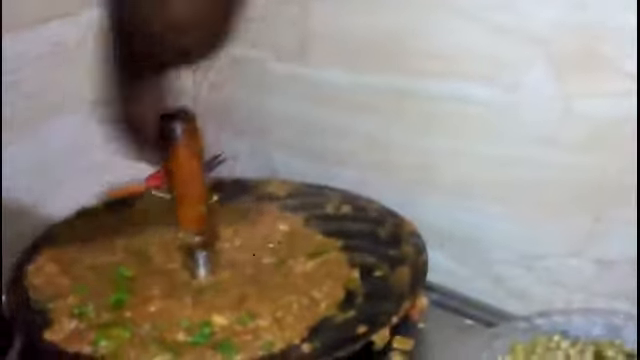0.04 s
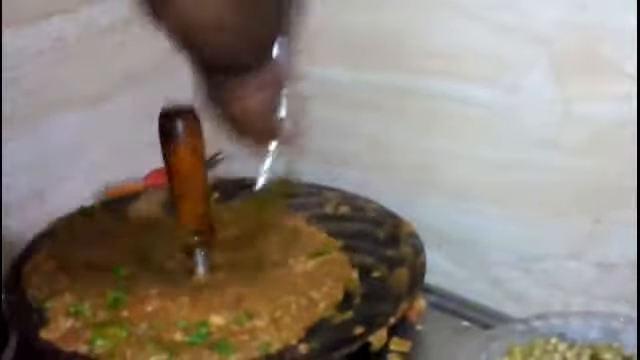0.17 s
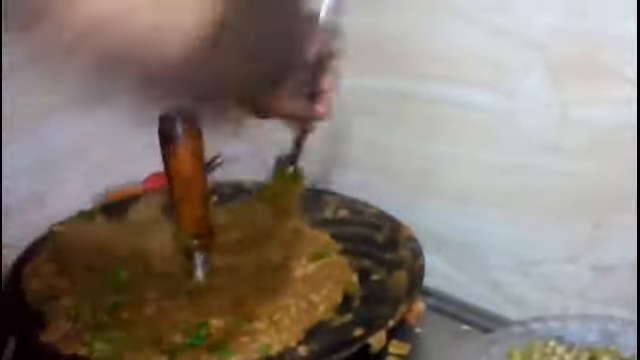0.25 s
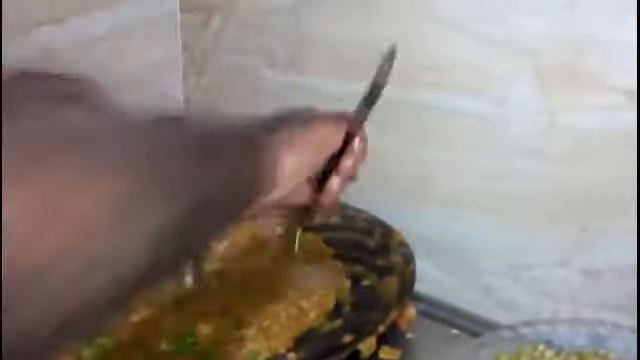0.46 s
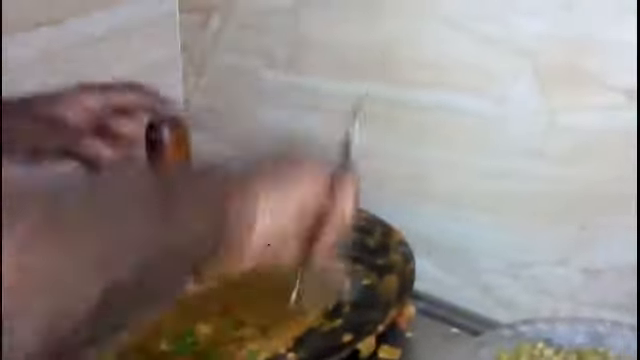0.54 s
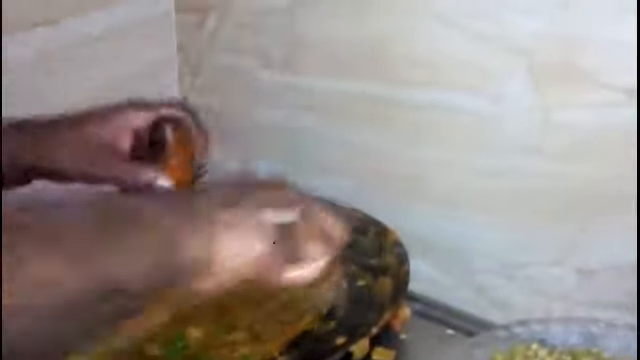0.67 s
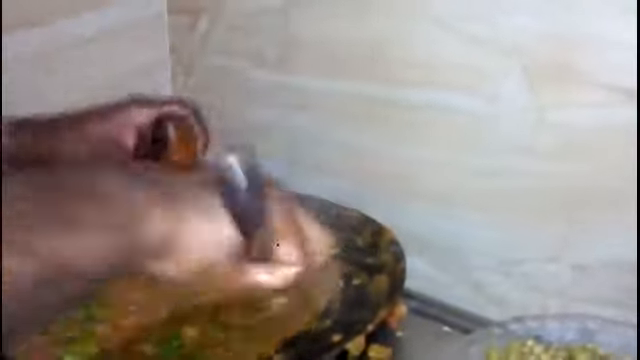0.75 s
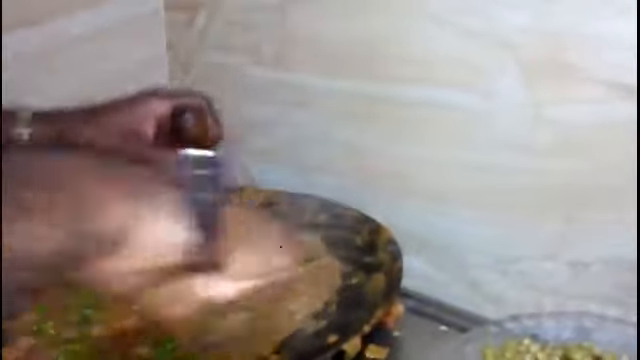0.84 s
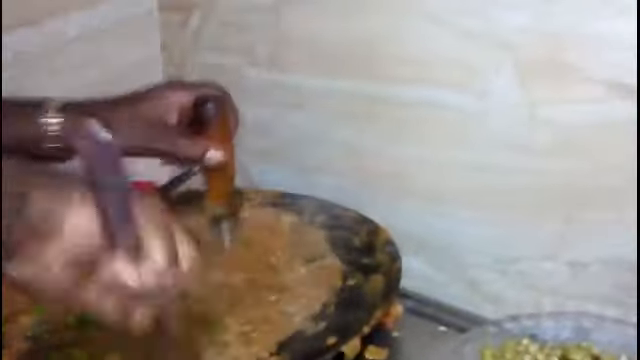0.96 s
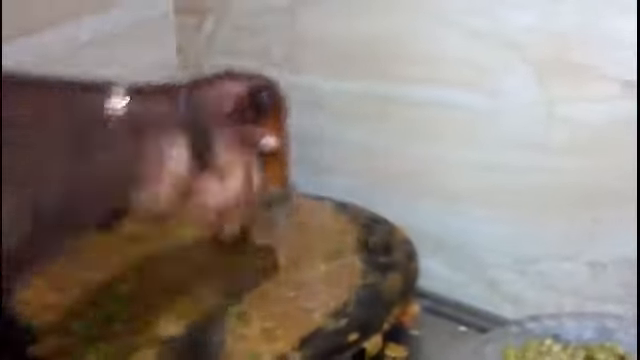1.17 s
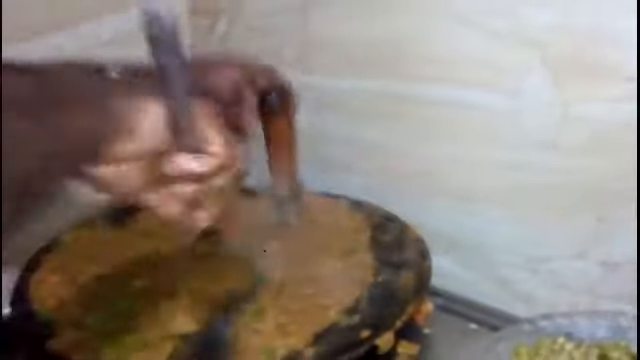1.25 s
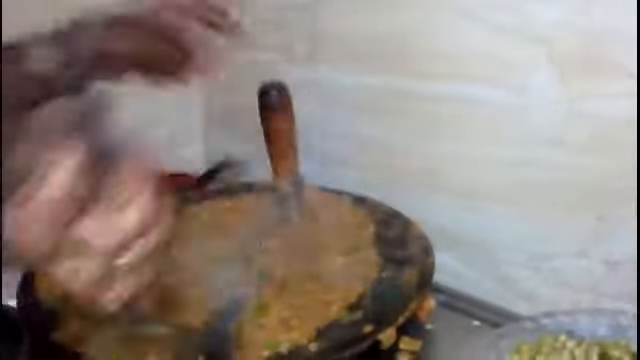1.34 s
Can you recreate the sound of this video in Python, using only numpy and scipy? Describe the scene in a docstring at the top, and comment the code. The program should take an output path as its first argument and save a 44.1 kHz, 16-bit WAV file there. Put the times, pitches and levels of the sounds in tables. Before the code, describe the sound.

Metal spatula scrapes and clanks on an iron griddle, two loud hits amid short scrapes

```python
"""A steel spatula works thick food on a flat iron griddle in a small tiled kitchen, over a faint steady sizzle.
First the blade scrapes: dense random slips, coloured, with noisy resonances that swell as the edge catches.
Then it comes down four times: noise bursts for the clatter, decaying sines for the brief ring of both metals.
Soft arches of narrow noise squelch from the opening scrape until after the last blow, as food is pushed.
From the last blow the blade slides on in a second scrape; a light touch of the edge follows."""
import sys
import numpy as np
from scipy import signal
from scipy.fft import rfft, irfft, next_fast_len
from scipy.io import wavfile

SR = 44100
rng = np.random.default_rng(int(sys.argv[2]) if len(sys.argv) > 2 else 0)


def digitize_waveform(pressure):
    """Quantize a signal to 16-bit integers and store it at the path in sys.argv[1].

    Rows of a 2-D input are taken as channels; values are limited to [-1, 1].
    """
    field = np.atleast_2d(pressure).T
    bounded = np.clip(field, -1, 1)
    quanta = np.round(bounded * 32767).astype(np.int16)
    wavfile.write(sys.argv[1], SR, quanta)


N = 61739
TIME = np.arange(N) / SR  # s

# blows of the spatula: t/s, crack level/dB, clatter level/dB, clatter t60/s, swell/s, griddle level/dB,
# strike place (0 inner - 1 outer), blade level/dB, blade tilt (0 flat - 1 edge on)
SPATULA_BLOWS = [(0.2408, -28.5, -20.5, .13, 0.00053, -47, .8, -51.5, .1),
                 (0.4823, -9.5, -13, .13, 0.0013, -19.5, 0.017, -27.5, .15),
                 (0.6822, -7, -13.5, .13, 0.0019, -26.5, 0.68, -26, .05),
                 (1.0126, -16, -30.5, 0.044, 0.00073, -41.5, 0.86, -28.5, .97)]
# griddle modes: f/Hz, t60/s when struck, level/dB at the inner place, level/dB at the outer place
GRIDDLE_MODES = [(655.4, 0.15, 2.5, -17.5), (716.3, .2, 0, -9.5), (844, 0.19, 0, -4),
                 (892, 0.18, 2.5, -24.5), (956, 0.14, -4.5, -18), (1099, 0.15, -8, -4.5),
                 (1111, .17, -11.5, 0.5), (1213, 0.33, -5.5, 0.5), (1215, .16, -2, -2.5),
                 (1313, .18, -0.5, -9), (1386, 0.45, -8.5, -6), (1514, 0.31, -21.5, -7.5),
                 (1689, 0.16, -6.5, -4), (1776, 0.19, -5.5, -8)]
# blade modes: f/Hz, t60/s when struck, level/dB landing flat, level/dB landing on the edge
BLADE_MODES = [(2330, 0.35, -7, -25), (2640, 0.03, -8.5, 0.5), (2740, .12, -8.5, -9.5),
               (3010, 0.064, -8, -22.5), (3240, .17, 0, -23.5), (3210, 0.26, -8.5, -21.5),
               (3280, 0.044, -7, -2), (3410, 0.23, -8, -19.5), (3640, 0.11, -4, -9), (3910, .2, -5, -19),
               (3860, 0.15, -4, -2.5), (4065, 0.017, -5.5, 4.5), (4600, 0.15, -10, -22.5),
               (4670, 0.23, 1, -8.5), (4820, .06, -12.5, -8), (5550, .07, -10.5, -4.5),
               (6780, .14, -13.5, -19.5), (6680, .06, -13, -2.5), (8100, 0.023, -22.5, -4),
               (7820, 0.046, -21.5, -6.5)]


def from_db(db):
    """Decibels to gain."""
    return 10 ** (np.asarray(db) / 20)


def rms_one(x):
    """Scale to unit rms."""
    return x / np.sqrt(np.mean(x ** 2) + 1e-20)


def at_hz(points, hz):
    """Read a table on a log-frequency axis."""
    f, value = np.transpose(points)
    return np.interp(np.log(np.maximum(hz, 1)), np.log(f), value)


def low_cut(x, hz):
    """Third-order high-pass."""
    return signal.sosfilt(signal.butter(3, hz, "high", fs=SR, output="sos"), x + 1e-18)


def coloured(x, spectrum):
    """Give x a smooth spectrum; rms 1."""
    size = next_fast_len(N)
    gain = from_db(at_hz(spectrum, np.fft.rfftfreq(size, 1 / SR)))
    return rms_one(irfft(rfft(x, size) * gain, size)[:N])


def resonant_noise(hz, width_hz):
    """Noise through a two-stage resonance; rms 1."""
    ratio = np.exp(np.arcsinh(width_hz / hz / 2))
    edges = [hz / ratio, min(hz * ratio, SR / 2 - 1)]
    band = signal.butter(2, edges, "band", fs=SR, output="sos")
    return rms_one(signal.sosfilt(band, rng.standard_normal(2 * N))[N:])  # drop the filter's build-up


def struck(start, swell, t60):
    """Envelope that swells quickly and dies away."""
    age = np.maximum(TIME - start, 0)
    return (1 - np.exp(-age / swell)) * np.exp(-np.log(1000) * age / t60)


def mode(start, hz, swell, t60):
    """One decaying sine."""
    return struck(start, swell, t60) * np.sin(2 * np.pi * hz * (TIME - start))


def pressed_mode(start, hz, swell, t60):
    """A decaying sine that builds up more gradually, under a soft, long contact."""
    return (1 - np.exp(-np.maximum(TIME - start, 0) / swell)) * mode(start, hz, swell, t60)


def swelling(middle, length, hz, width_hz, glide=0):
    """A noisy resonance that rises and falls in one arch while its centre glides (Hz per s); rms 1 at the top."""
    from_middle = TIME - middle
    arch = np.cos(np.pi * np.clip(from_middle / length, -.5, .5))
    narrow = signal.butter(2, width_hz / 2, fs=SR, output="sos")
    a, b = signal.sosfilt(narrow, rng.standard_normal((2, N + SR // 10)))[:, -N:]
    phase = 2 * np.pi * (hz + glide * from_middle / 2) * from_middle
    noise = a * np.cos(phase) + b * np.sin(phase)  # slow noise shifted up to the centre
    return rms_one(arch * noise) * np.sqrt(np.mean(arch ** 2))


def through_modes(x, modes):
    """Drive a bank of two-pole resonators, one per mode, all with one ring time; rms 1."""
    ring_t60_s = 0.15
    r = from_db(-60 / (ring_t60_s * SR))  # decay per sample
    out = 0
    for hz, _, first_db, second_db in modes:
        poles = [1, -2 * r * np.cos(2 * np.pi * hz / SR), r * r]
        ring = signal.lfilter([1, 0, -1], poles, x + 1e-18)
        out = out + from_db((first_db + second_db) / 2) * ring
    return rms_one(out)


def sizzle_and_air():
    """Faint sizzle and still kitchen air: steady coloured noise."""
    # spectrum: f/Hz, relative level/dB per Hz
    air_colour = [(25, -15), (60, -4.5), (90, -1), (130, -1), (300, -5.5), (900, 3.5), (2500, -13),
                  (6000, -11), (10000, -15.5), (15000, -20.5)]
    level_db = -63.5
    return from_db(level_db) * coloured(rng.standard_normal(N), air_colour)


def kitchen(x):
    """Diffuse echo of tiled walls: noise bands that die away, the low ones slowest."""
    # reverberation: f/Hz, t60/s
    room_t60 = [(150, 0.55), (700, 0.4), (2000, 0.31), (4000, 0.27), (8000, 0.25), (14000, 0.28)]
    delay_s, swell_s = 0.004, 0.004
    edges = np.geomspace(60, 16000, 9)  # Hz
    tail = 0
    for low, high in zip(edges, edges[1:]):
        band_filter = signal.butter(3, [low, high], "band", fs=SR, output="sos")
        band = signal.sosfilt(band_filter, rng.standard_normal(N))
        tail = tail + band * struck(delay_s, swell_s, at_hz(room_t60, np.sqrt(low * high)))
    return signal.fftconvolve(x, tail / np.sqrt(np.sum(tail ** 2)))[:N]


def food():
    """Dull squelches and faint smears as the thick mass is pushed about: arches of narrow noise."""
    # soft shoves of the food: t/s, length/s, f/Hz, level/dB before the low cut
    shoves = [(0.020, 0.1, 440, -51), (0.199, .09, 355.6, -49), (0.342, 0.12, 358, -55.5),
              (0.420, 0.089, 817, -61.5), (0.642, 0.041, 469, -46), (0.670, 0.086, 314.7, -49.5),
              (0.925, 0.24, 330.3, -58.5), (0.936, 0.27, 933, -63), (1.270, 0.083, 519.6, -60.5),
              (1.388, 0.11, 1000, -71.5)]
    # smears of the blade through the food: t/s, length/s, f/Hz, width/Hz, level/dB
    smears = [(0.420, .08, 5600, 2000, -64), (0.895, 0.1, 6290, 2010, -64), (0.965, 0.11, 1830, 120, -64.5)]
    width_share = .4  # of the centre frequency
    squelches = sum(from_db(db) * swelling(s, length, hz, width_share * hz) for s, length, hz, db in shoves)
    smearing = sum(from_db(db) * swelling(s, length, hz, width) for s, length, hz, width, db in smears)
    return low_cut(squelches, 200) + smearing


def touches():
    """The edge grazes the iron: short puffs of resonant noise."""
    # light touches of the edge: t/s, level/dB
    grazes = [(.460, -54.5), (1.002, -70), (1.249, -51)]
    swell_s, t60_s = 0.0017, .05
    envelope = sum(from_db(db) * struck(s, swell_s, t60_s) for s, db in grazes)
    return resonant_noise(4800, width_hz=2500) * envelope


def tiny_slips():
    """Thousands of random clicks a second, of either sign and uneven size, as the edge sticks and slips."""
    slips_per_s, spread_db = 9000, 2.55
    happens = rng.random(N) < slips_per_s / SR
    sign = rng.choice([-1, 1], N)
    size_db = spread_db * np.minimum(rng.exponential(1, N), 5)
    return happens * sign * from_db(size_db)


def catches():
    """The sliding edge catches and one resonance sings out, its pitch gliding."""
    # catches: t/s, length/s, f/Hz, width/Hz, glide/Hz per s, level/dB
    caught = [(0.010, 0.07, 795, 180, 109, -38.5), (0.040, 0.049, 2370, 55, 100, -45.5),
              (0.045, .06, 3380, 86, -500, -41.5), (0.052, .09, 4660, 70, 300.5, -42.5),
              (0.056, 0.039, 5460, 79, 700, -38.5), (0.075, .03, 6850, 300, 2000, -43.5),
              (0.088, .045, 4000, 200, -500, -33), (0.120, 0.086, 1626, 185.2, 3000, -47),
              (0.128, .052, 3840, 60, -2000, -36), (0.135, 0.039, 5330, 90, -4000, -39.5),
              (0.145, .1, 4500, 180, -3500, -43.5), (0.150, 0.1, 3570, 80, -700, -42),
              (0.160, .085, 5540, 200, -4000, -44.5), (0.180, 0.051, 799, 166, -100, -34),
              (1.060, .07, 2670, 150, -1500, -44), (1.105, 0.17, 3977, 170, 100, -39.5),
              (1.110, .06, 4500, 190, 4000, -39.5), (1.130, 0.1, 3080, 90, 100, -44.5),
              (1.135, 0.053, 7050, 150, 1000, -43), (1.143, 0.1, 2353, 30, 20, -39.5),
              (1.149, 0.049, 5260, 300, 14002, -42), (1.152, 0.057, 1520, 90, 100, -43),
              (1.180, 0.1, 800, 170, -1000, -50)]
    return sum(from_db(db) * swelling(s, length, hz, width, glide)
               for s, length, hz, width, glide, db in caught)


def scrapes():
    """Tiny slips under a juddering hand make a rasp and ring griddle and blade; at times a resonance catches."""
    # pressure of each scrape: t/s, level/dB
    pressures = [
        [(0, -33), (.03, -41), (.055, -40), (.1, -39), (.135, -40), (.18, -39), (.2, -40.5), (.215, -48.5),
         (.24, -53)],
        [(1.0, -65), (1.012, -51.5), (1.022, -41.5), (1.07, -41), (1.1, -40.5), (1.13, -37.5), (1.162, -36),
         (1.18, -47.5), (1.21, -65)],
    ]
    # colour of each scrape: f/Hz, relative level/dB per Hz, before the treble moves
    colours = [
        [(150, -52), (300, -35), (450, -14), (590, -38), (720, 3), (1050, -9), (1700, -4), (3000, -14.5),
         (3900, -6), (5500, -10.5), (7000, -12.5), (8500, -17), (11000, -31), (12500, -54), (15000, -50)],
        [(180, -76), (300, -49), (416, -15), (597, -20.5), (1130, -7), (1310, -14), (1520, 1.5), (1700, -12),
         (2400, -3), (3490, -13), (3860, -0.5), (5710, -17.5), (7060, -2.5), (8460, -31), (10600, -22.5),
         (15000, -57)],
    ]
    # treble of each scrape as the blade's angle changes: t/s, level/dB
    trebles = [
        [(0, -18), (.06, -2), (.13, 6), (.19, 2.5)],
        [(1.02, 1), (1.07, 4), (1.12, 6.5), (1.17, -1.5)],
    ]
    # ringing under each scrape, relative to its rms force: griddle level/dB, blade level/dB
    slide_rings = [(-15, -11), (-11, -16)]
    treble_hz, judder_hz, judder_db = 4840, 70, 0.5  # judder depth is rms
    treble_split = signal.butter(2, treble_hz, fs=SR, output="sos")
    out = np.zeros(N)
    for pressure, colour, treble, (griddle_db, blade_db) in zip(pressures, colours, trebles, slide_rings):
        slips = tiny_slips()
        rasp = coloured(slips, colour)
        body = signal.sosfiltfilt(treble_split, rasp)
        rasp = body + (rasp - body) * from_db(np.interp(TIME, *np.transpose(treble)))

        judder = judder_db * resonant_noise(judder_hz, 2 * judder_hz)
        level_db = np.interp(TIME, *np.transpose(pressure)) + judder
        sliding = (TIME >= pressure[0][0]) * (TIME < pressure[-1][0])
        force = from_db(level_db) * sliding

        griddle = from_db(griddle_db) * through_modes(slips * force, GRIDDLE_MODES)
        blade = from_db(blade_db) * through_modes(slips * force, BLADE_MODES)
        out += rasp * force + np.sqrt(np.mean(force ** 2)) * (griddle + blade)
    return out + catches()


def thuds():
    """Low modes that swell as the blade presses down."""
    # pressed modes: t/s, f/Hz, level/dB, swell/s, t60/s
    pressed = [(0.241, 425.6, -23.5, 0.0035, 0.093), (1.0135, 660, -5.5, 0.021, 0.097),
               (1.0135, 772, -22.5, 0.0083, 0.086), (1.0135, 863, -25, 0.0065, 0.085),
               (1.0135, 429, -33, 0.01, .12)]
    return sum(from_db(db) * pressed_mode(s, hz, swell, t60) for s, hz, db, swell, t60 in pressed)


def ringing():
    """Each blow rings griddle and blade; the place struck and the blade's tilt set the mix of modes."""
    out = np.zeros(N)
    for s, _, _, _, swell, griddle_db, place, blade_db, tilt in SPATULA_BLOWS:
        modes = [(hz, t60, griddle_db + inner_db + place * (outer_db - inner_db))
                 for hz, t60, inner_db, outer_db in GRIDDLE_MODES]
        modes += [(hz, t60, blade_db + flat_db + tilt * (edge_db - flat_db))
                  for hz, t60, flat_db, edge_db in BLADE_MODES]
        for k, (hz, t60, db) in enumerate(modes):
            start = s + rng.random() / hz  # up to one cycle late, so the phases scatter
            out += (-1) ** k * from_db(db) * mode(start, hz, swell, t60)
    return low_cut(out + thuds(), 320)


def clatter():
    """Steel meets iron: a short crack and a crowd of close, quickly damped modes, as bursts of coloured noise."""
    # colour of each blow's clatter: f/Hz, relative level/dB per Hz, before the low cut
    clatter_colours = [
        [(100, -33), (240, -20.5), (430, -2.5), (650, -8), (1090, -12), (1680, 0), (1870, -7.5), (2080, 0.5),
         (2400, -13), (3000, -11.5), (3500, -5), (4800, -10.5), (6500, -8), (7800, -20), (11000, -28),
         (15000, -38)],
        [(150, -42), (357, -17), (560, -25.5), (680, -7), (1250, -4), (1520, -14), (1730, -8), (1950, -18.5),
         (3030, -10.5), (4900, -17), (7000, -22), (11000, -36.5), (13000, -52.5), (15000, -52)],
        [(88, -61), (150, -29), (401, -12.5), (556, -28.5), (833, -1), (972, -5.5), (1430, -5.5), (2020, -8.5),
         (2970, -5), (3340, -11.5), (3820, -5), (5840, -14.5), (6430, -15.5), (7790, -25), (10800, -29),
         (15000, -51.5)],
        [(150, -48), (500, -15), (800, -12.5), (1600, -13.5), (2050, -42), (2680, 0.5), (3050, -23),
         (3350, -10.5), (4050, 7.5), (4400, -10.5), (5400, -1.5), (6100, -19), (6850, -4), (8100, -8),
         (8800, -31), (10800, -19), (15000, -38)],
    ]
    crack_t60_s = 0.03
    out = np.zeros(N)
    for (s, crack_db, clatter_db, t60, swell, *_), colour in zip(SPATULA_BLOWS, clatter_colours):
        crack = from_db(crack_db) * struck(s, swell, crack_t60_s)
        crowd = from_db(clatter_db) * struck(s, swell, t60)
        out += (crowd + crack) * coloured(rng.standard_normal(N), colour)
    return low_cut(out, 180)


def scene():
    """Spatula, griddle and food in the kitchen."""
    hits, rings = clatter(), ringing()
    sliding = scrapes() + touches() + food()
    blow_send_db, ring_send_db, slide_send_db = -11.5, -16.5, -13.5
    send = from_db(blow_send_db) * hits + from_db(ring_send_db) * rings + from_db(slide_send_db) * sliding
    return (hits + rings + sliding + kitchen(send) + sizzle_and_air())[None]


def record(dry):
    """A steep low-pass takes off the top, 60 dB down from 16.3 kHz."""
    return signal.sosfilt(signal.cheby2(14, 60, 16300, fs=SR, output="sos"), dry)


dry = scene()
out = record(dry)
digitize_waveform(out)
```